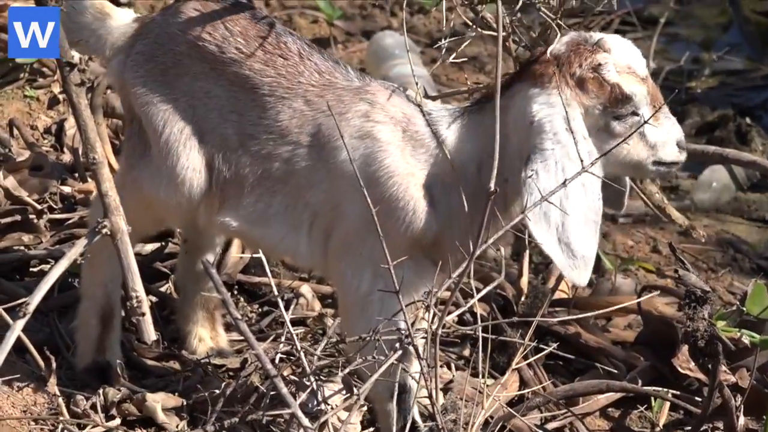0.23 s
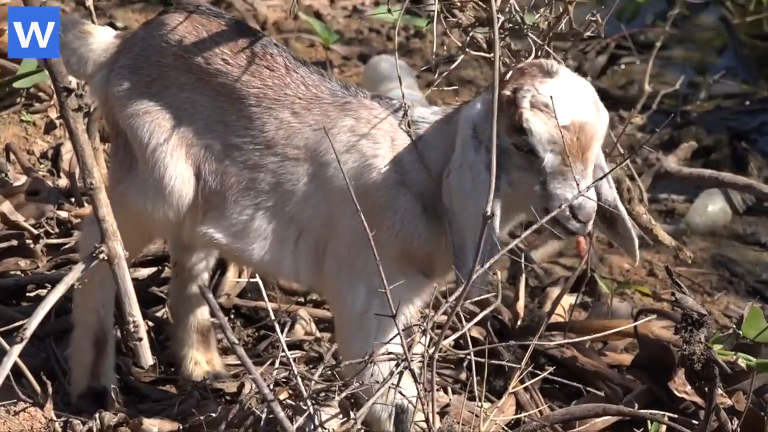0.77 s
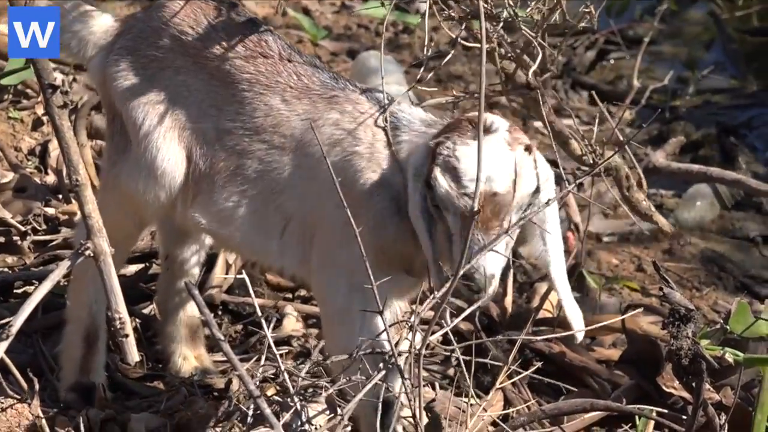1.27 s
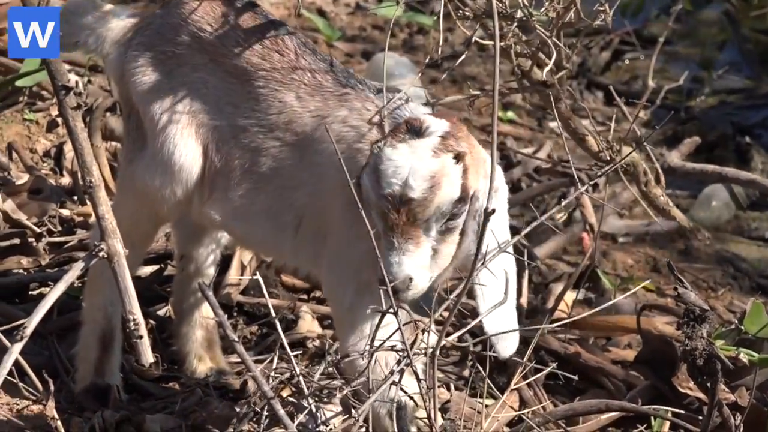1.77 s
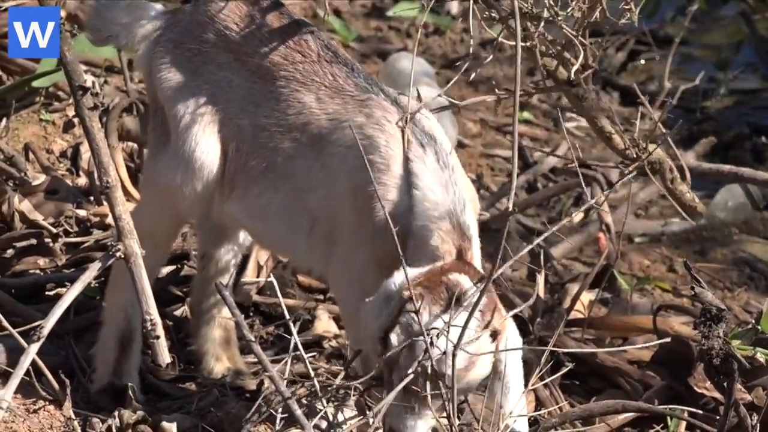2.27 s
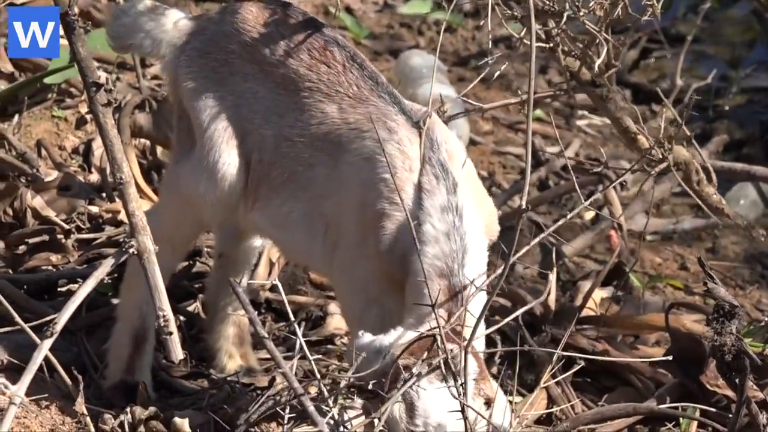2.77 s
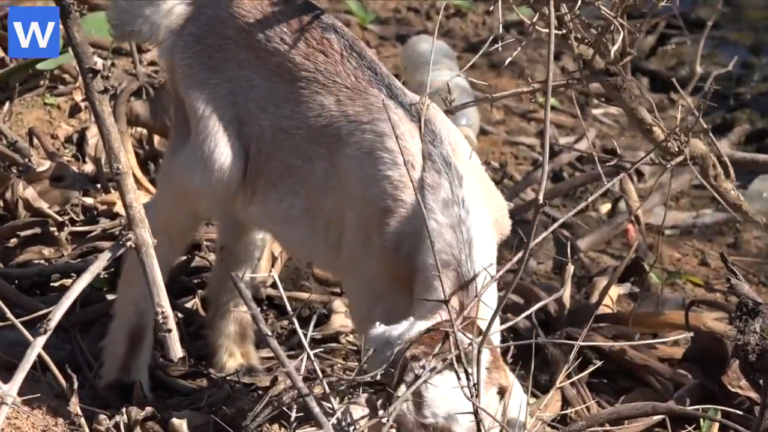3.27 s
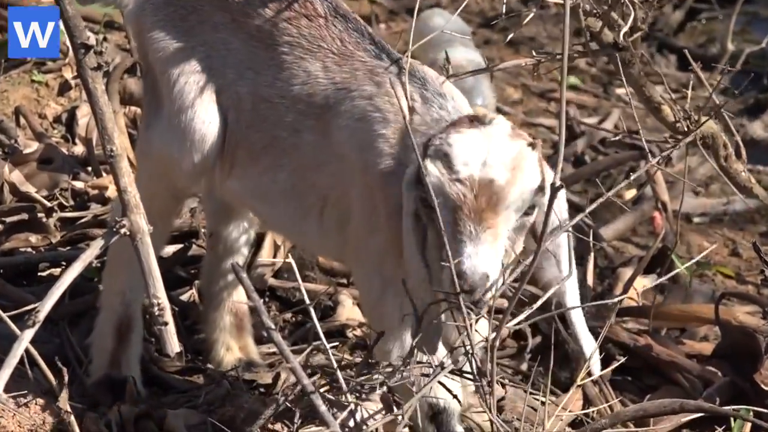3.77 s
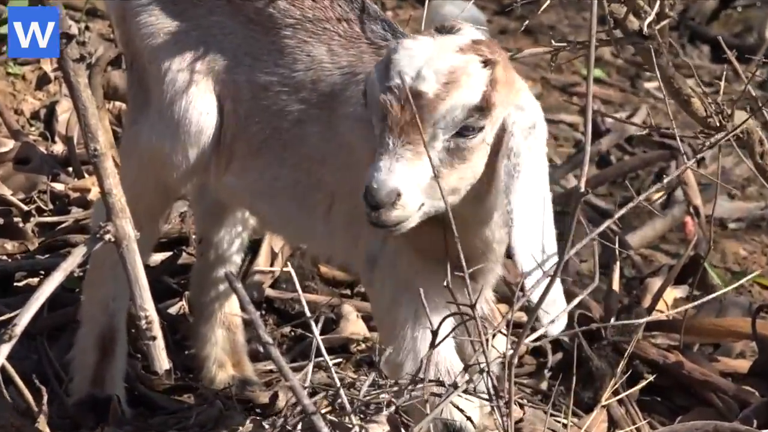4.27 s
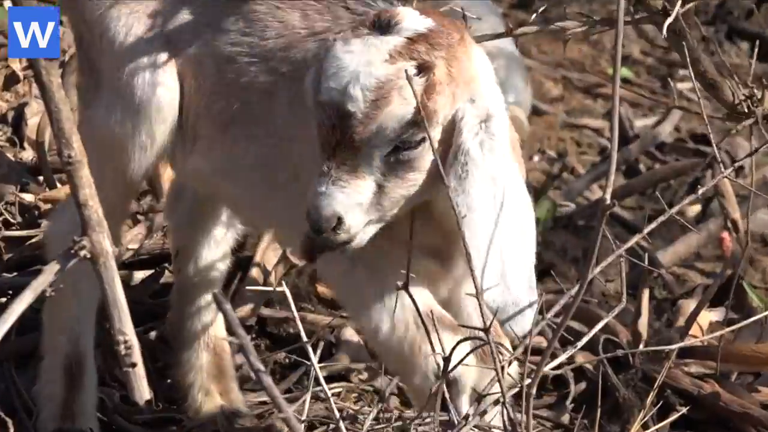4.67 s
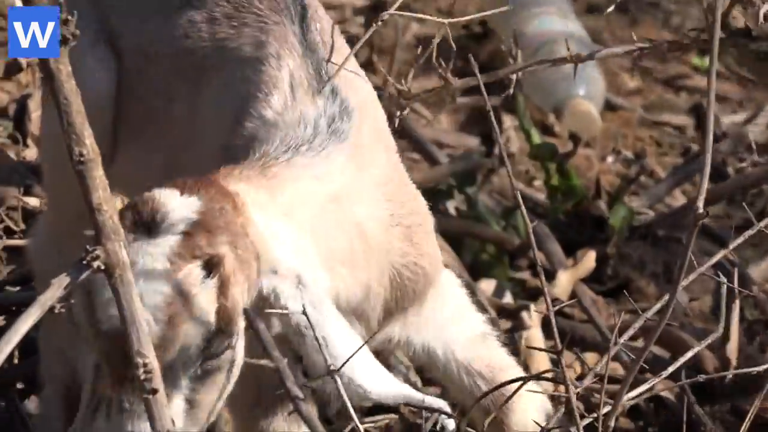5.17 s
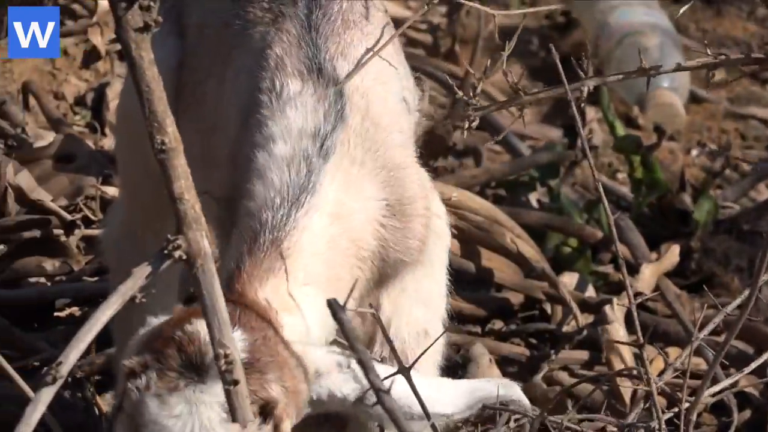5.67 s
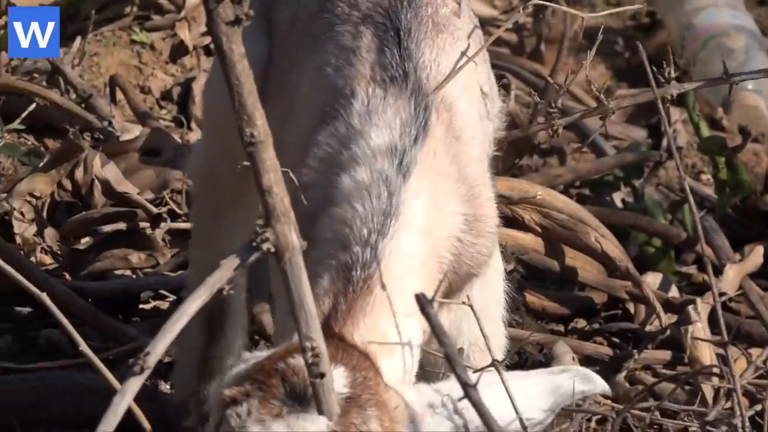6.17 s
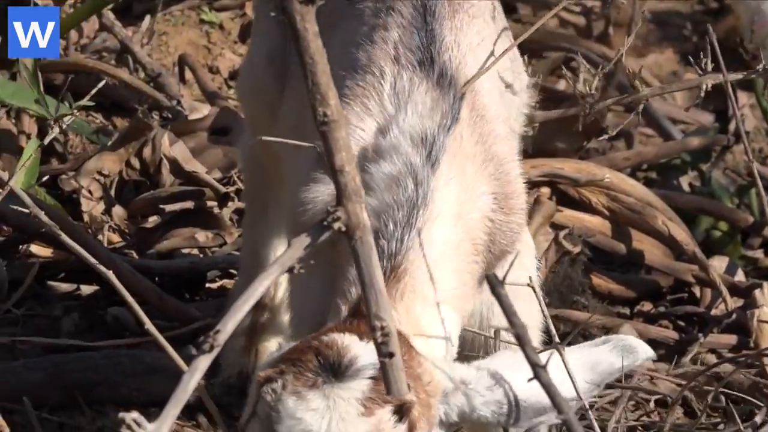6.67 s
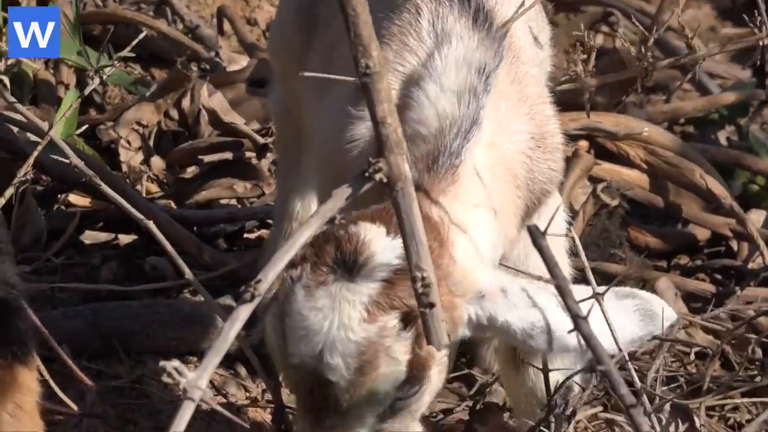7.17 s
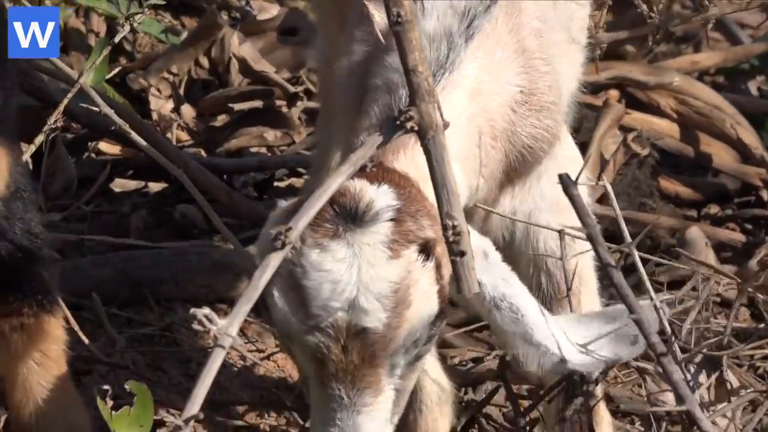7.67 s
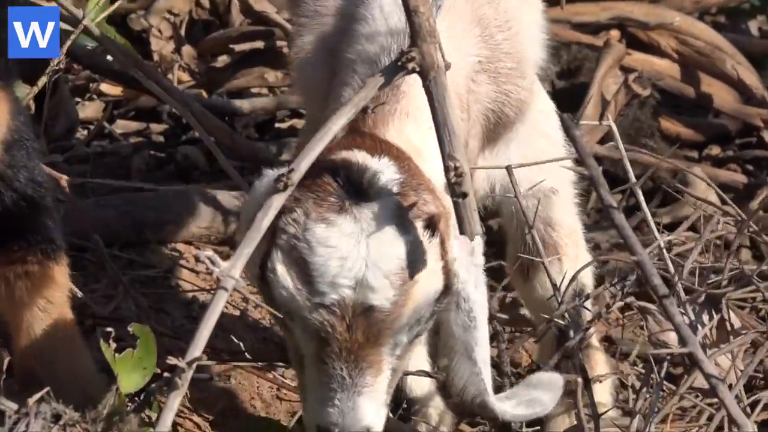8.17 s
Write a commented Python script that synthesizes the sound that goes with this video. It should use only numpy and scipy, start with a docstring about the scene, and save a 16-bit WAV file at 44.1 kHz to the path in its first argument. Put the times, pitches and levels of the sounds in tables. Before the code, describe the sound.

Small birds twitter over a distant chattering flock while wind thumps the microphone and a young goat rustles dry litter, snapping twigs.

```python
"""On a stream bank, a soft hiss of far foliage lies under a distant flock, noisy chatter of many blurred whistles.
From the start, near birds twitter in the brush: short gliding tones, buzzy where their pitch vibrates fast.
Gusts soon buffet the two microphone ports: low noise rumbles and thumps, and higher noise flutters.
Close by, a kid goat noses through the litter: bursts of tiny noise cracks, faint until about two seconds in.
Twigs snap under it from a little before then: sharp noise bursts with a brief ring."""
import sys
import numpy as np
from scipy import signal
from scipy.fft import rfft, irfft, next_fast_len
from scipy.io import wavfile
from scipy.ndimage import uniform_filter1d

SR = 44100
rng = np.random.default_rng(int(sys.argv[2]) if len(sys.argv) > 2 else 0)


def put_to_file(sound):
    """Save the sound as 16-bit audio at rate SR, in the file named by the first command-line argument."""
    columns = np.atleast_2d(sound).T  # one column per channel
    safe = np.clip(columns, -1, 1)
    whole_steps = np.round(safe * 32767)
    wavfile.write(sys.argv[1], SR, whole_steps.astype(np.int16))


N = 371322
T = np.arange(N) / SR  # s

# Levels in the event tables come before each layer's own trim; spectra are relative, per Hz.
# spectrum of the far foliage: pitch_hz, level_db
AIR_COLOUR = [(250, -3.5), (500, 1.5), (800, 1.5), (1130, 6), (1290, -0.5), (1550, 4.5), (2200, 0),
              (3500, 3.5), (5000, 4), (7200, -3.5), (9000, -8), (10800, -13), (12500, -7.5), (14700, -19)]
# spectrum of the hiss that differs between the ports: pitch_hz, level_db
AIR_WIDE_COLOUR = [(800, 16), (2400, -19), (4000, -21), (6200, 0), (7500, 27.5), (9500, 18), (10500, 18),
                   (12000, 2), (15000, -15)]
AIR_DB = -41.5

# loudness of the distant flock: start_s, level_db
FLOCK_LEVEL = [(0, -33), (.35, -38.5), (1.2, -37.5), (1.6, -35), (2.35, -45), (2.7, -36.5), (3.1, -35.5),
               (3.5, -32), (4.2, -38), (4.9, -40.5), (5.5, -30.5), (6, -48.5), (6.4, -32.5), (6.9, -41),
               (7.3, -32), (7.5, -43), (7.9, -33), (8.42, -31.5)]
# spectrum of the distant flock: pitch_hz, level_db
FLOCK_COLOUR = [(1500, -39.5), (2500, -8.5), (2950, 3), (3600, 2), (4700, -2.5), (6200, 0.5), (7000, -7.5),
                (9000, -17.5)]
FLOCK_ANSWER_DB, FLOCK_ANSWER_S = -5.5, 0.067  # the flock swells around each near note

# notes of the near birds, with one faint distant call near 1 kHz at 7.8 s: start_s, syllable, length_s,
# middle_pitch_hz, level_db
NEAR_NOTES = [(.01, "slur", .053, 6530, -33.5), (0.052, "arch", 0.039, 5400, -27),
              (0.134, "arch", 0.049, 4420, -29), (.174, "hook", 0.053, 6650, -37),
              (.25, "hook", 0.042, 6340, -38), (0.273, "buzz", 0.037, 3690, -36.5),
              (0.393, "slur", 0.045, 5100, -36.5), (.42, "slur", .038, 3700, -36),
              (0.491, "hook", 0.056, 6560, -35.5), (0.573, "hook", 0.048, 5970, -33.5),
              (0.843, "whistle", 0.038, 3460, -35), (.841, "hook", 0.067, 6670, -39.5),
              (.912, "buzz", .06, 4600, -33.5), (1.044, "rasp", .06, 4150, -35.5),
              (1.239, "rasp", 0.095, 4450, -39), (1.395, "arch", 0.062, 4640, -30),
              (1.451, "dive", 0.026, 2710, -33), (1.467, "whistle", 0.035, 3725, -28),
              (1.57, "buzz", 0.047, 4620, -34.5), (1.645, "rise", 0.033, 3510, -35),
              (1.717, "whistle", .025, 6400, -35), (1.718, "rasp", 0.028, 4240, -31),
              (1.89, "whistle", 0.065, 3560, -32), (1.95, "rasp", 0.037, 3700, -31),
              (2.042, "rise", .023, 4630, -33), (2.072, "buzz", 0.055, 3750, -28.5),
              (2.218, "buzz", .04, 4270, -34), (2.226, "slur", .037, 6600, -39),
              (2.471, "whistle", 0.047, 4740, -38), (2.525, "hook", 0.061, 3700, -30.5),
              (2.807, "rise", .035, 4790, -30.5), (2.838, "dive", .035, 4600, -37),
              (2.973, "slur", .06, 4270, -31.5), (3.038, "arch", 0.017, 4990, -26.5),
              (3.059, "dive", 0.071, 2775, -32), (3.151, "rasp", .032, 2560, -31.5),
              (3.468, "whistle", 0.026, 4480, -27), (3.469, "dive", .034, 2620, -34),
              (3.591, "hook", 0.033, 4740, -33), (3.697, "slur", 0.047, 4120, -33.5),
              (3.78, "dive", .02, 3290, -31.5), (3.886, "rise", 0.023, 4220, -34),
              (3.923, "rasp", 0.034, 3710, -34), (3.962, "dive", .04, 1740, -42),
              (3.974, "whistle", .029, 6570, -38), (4.019, "rasp", 0.045, 4370, -33),
              (4.389, "arch", .04, 4620, -29), (4.452, "rise", 0.03, 3640, -30),
              (4.473, "rasp", 0.029, 3800, -31.5), (4.519, "rasp", .02, 2254, -31.5),
              (4.608, "slur", .06, 4700, -29), (4.676, "whistle", .045, 3680, -33),
              (4.686, "arch", 0.048, 5070, -32.5), (5.052, "hook", 0.047, 7050, -33),
              (5.116, "arch", 0.052, 5320, -26), (5.2, "rise", .032, 4240, -24.5),
              (5.322, "buzz", .06, 4900, -34.5), (5.44, "slur", 0.029, 3950, -31.5),
              (5.487, "arch", .05, 5090, -29), (5.564, "rise", 0.022, 4000, -28),
              (5.905, "whistle", .041, 6520, -38), (5.93, "buzz", 0.026, 4800, -35),
              (6.313, "whistle", .04, 6200, -34.5), (6.348, "slur", .037, 4690, -30.5),
              (6.398, "whistle", .057, 3640, -32), (6.637, "arch", 0.042, 5750, -25),
              (6.721, "hook", 0.041, 4390, -26.5), (6.74, "whistle", .02, 6400, -32),
              (6.787, "slur", 0.029, 3340, -36.5), (6.858, "whistle", 0.034, 3620, -34.5),
              (6.97, "buzz", 0.063, 3710, -35.5), (7.084, "dive", 0.039, 5200, -34),
              (7.171, "rasp", 0.042, 4070, -35), (7.253, "buzz", .055, 4810, -29.5),
              (7.389, "hook", .035, 3860, -36.5), (7.505, "hook", 0.023, 2200, -41),
              (7.56, "slur", 0.029, 4470, -26.5), (7.622, "rise", 0.024, 3940, -27.5),
              (7.719, "rise", 0.031, 3950, -33), (7.806, "whistle", 0.068, 1000, -47),
              (7.824, "dive", .02, 4450, -31.5), (7.993, "whistle", 0.014, 6170, -32.5),
              (8.094, "rasp", 0.086, 4100, -29.5), (8.236, "dive", 0.041, 4540, -31.5),
              (8.291, "rasp", 0.053, 3730, -29.5)]
# shape of each named syllable: start_pitch (ratio to middle), end_pitch (ratio to middle), buzz (0-1)
SYLLABLES = {"arch": (.69, .66, 0.21), "rise": (.83, 1.13, 0.26), "whistle": (1.02, 0.98, 0.091),
             "hook": (.8, 0.96, 0.49), "slur": (0.98, .84, 0.47), "buzz": (.93, .85, 0.71),
             "rasp": (1.25, .77, 0.903), "dive": (1.27, .69, 0.34)}

# gusts at the microphone: start_s, length_s, rumble_db (large eddies), flutter_db (small eddies)
GUSTS = [(0.03, 0.13, -16, -30.5), (0.245, 0.032, -15.5, -25), (0.318, 0.044, -15, -26),
         (0.43, 0.12, -21.5, -39.5), (0.875, 0.045, -18, -26), (1.169, 0.09, -19, -23.5),
         (1.393, 0.11, -19, -31), (2.144, 0.22, -18, -23.5), (2.358, 0.14, -45, -29.5),
         (2.615, 0.14, -30, -30), (2.781, 0.056, -25, -26.5), (3.064, 0.065, -19.5, -31.5),
         (3.19, 0.15, -20.5, -39), (3.385, 0.19, -19.5, -24), (3.787, 0.4, -21.5, -27.5),
         (4.522, 0.23, -20, -23.5), (4.777, 0.52, -32.5, -27.5), (5.318, 0.077, -32, -29),
         (5.441, 0.066, -28, -21), (5.572, 0.04, -34.5, -18.5), (5.685, 0.2, -25.0, -29),
         (5.988, 0.21, -20, -30.5), (6.076, 0.28, -29, -24), (6.374, 0.1, -46, -28),
         (6.54, 0.078, -22.5, -24.5), (6.733, 0.17, -25.5, -28), (7.528, 0.074, -18, -27),
         (7.7, 0.18, -27.0, -45), (8.05, 0.2, -19.5, -29.5), (8.296, 0.086, -18.0, -34.5)]
# steady wind between the gusts: start_s, rumble_db
DRAUGHT = [(0.0, -27.5), (0.82, -31.5), (1.04, -32.5), (1.33, -32.5), (1.85, -28.5), (2.03, -32.5),
           (2.45, -27), (2.6, -38), (2.95, -34), (3.3, -24.5), (4.4, -29.5), (5.55, -31.5), (6.5, -30),
           (6.9, -25), (7.02, -36), (7.15, -30.5), (7.5, -25.5), (8.42, -26.5)]
# side the wind strikes: start_s, rumble_left_minus_right_db, flutter_left_minus_right_db
WIND_SIDE = [(0, 2.5, 4), (0.6, 8, 5.5), (0.91, 1.5, -3), (1.3, 1.5, -6.5), (1.7, 4, -6.5),
             (2.32, -6.5, -5), (3, -1, -17), (3.5, 4.5, -15), (4.1, 2.5, -23), (4.6, 6, -7), (5.55, 5, -10),
             (6.65, 4, -9), (7.4, 1, -3), (8.15, 2, -28), (8.42, 3, -14)]
# spectrum of the large eddies: pitch_hz, level_db
RUMBLE_COLOUR = [(15, -22), (40, -14.5), (65, -2), (100, 2.5), (135, -2), (200, -10.5), (320, -43)]
# spectrum of the deepest eddies: pitch_hz, level_db
DEEP_COLOUR = [(12, -26), (25, -7.5), (42, 2.5), (60, 7), (90, -8), (160, -25)]
# share of the deepest eddies in the rumble: start_s, deep_rumble_db
DEEP_SHARE = [(0, 1), (1.2, -3.5), (2.2, 0.5), (2.6, -27), (3.2, 1.5), (3.8, -11), (4.6, -6), (5.2, -32),
              (6.2, -16), (7.2, -1.5), (8.4, -1.5)]
# spectrum of the small eddies: pitch_hz, level_db
FLUTTER_COLOUR = [(70, -18.5), (120, -1), (170, -0.5), (250, -3.5), (350, -11), (500, -20), (750, -28),
                  (1200, -51.5)]
# single eddies thumping the ports: centre_s, peak_db, pitch_hz
THUMPS = [(.14, -19, 70), (0.37, -14, 55.4), (1.226, -40, 98), (2.219, -3, 71), (4.629, -4, 80),
          (7.604, -7.5, 115), (8.076, -7.5, 95), (8.191, -5, 80.5)]
GUST_ATTACK_S, GUST_RELEASE_S = 0.048, 0.032
DRAUGHT_FLUTTER_DB = -11.5  # against the rumble of the draught

# muzzle and hooves pushing into the litter: start_s, length_s, level_db
RUSTLES = [(2.15, 0.024, -56), (2.335, .05, -41), (3.44, 0.093, -46.5), (4.38, 0.022, -49), (4.7, .11, -45),
           (4.82, .18, -41), (5.04, 0.087, -45.5), (5.12, 0.21, -45), (5.33, .09, -41), (5.46, .15, -48.5),
           (5.62, 0.25, -44.5), (5.88, .18, -52), (6.09, 0.15, -46), (6.2, .26, -43), (6.54, .16, -43.5),
           (6.72, 0.1, -49), (7.72, 0.59, -50.5), (8.335, .08, -40.5)]
# spectrum of the dry leaves: pitch_hz, level_db
LEAF_COLOUR = [(300, -13.5), (800, -3.5), (1500, 0), (2500, -1), (4000, 1.5), (6000, 0), (9000, -4),
               (11000, -13), (15000, -16)]
RUSTLE_ATTACK_S, RUSTLE_RELEASE_S, LITTER_REST_DB = 0.007, 0.027, -56

# twigs snapping: start_s, peak_db, main_ring_hz, splintering_s
SNAPS = [(1.684, -21, 4300, .004), (2.175, -22.5, 7000, 0.0077), (2.3073, -9.5, 6200, 0.0037),
         (2.331, -16, 4540, .003), (2.337, -12.5, 6240, 0.016), (2.413, -17.5, 6000, .002),
         (2.4395, -11, 8200, 0.0024), (3.46, -15, 6400, 0.0081), (3.511, -13, 4430, 0.0025),
         (4.779, -18.5, 4200, .003), (4.8189, -1.5, 5850, 0.0038), (4.843, -14.5, 3800, 0.0054),
         (4.983, -15, 5900, .002), (5.377, -30, 3700, .005), (5.638, -16.5, 5370, 0.0037),
         (5.7524, -12.5, 4560, .002), (5.789, -21, 3520, .01), (5.8482, -3.5, 5900, 0.0079),
         (6.222, -24, 8500, .003), (6.357, -20, 7900, .003), (6.454, -22, 3400, 0.0049),
         (8.346, -22, 3000, .008), (8.3587, -13, 7900, 0.0069), (8.385, -20, 6800, .006)]
# spectrum of the snapping wood: pitch_hz, level_db
TWIG_COLOUR = [(500, -23), (1500, -11), (2600, -1), (4000, 2), (6000, 0), (7200, -0.5), (8500, 3.5),
               (10500, -2.5), (15000, -8)]

TOP_HZ = 15900  # upper limit of the recorder


def undb(db):
    """Decibels to gain."""
    return 10 ** (np.asarray(db) / 20)


def unit(x):
    """Scale to rms 1."""
    return x / np.sqrt(np.mean(x ** 2) + 1e-20)


def smooth(x, seconds):
    """Running mean."""
    return uniform_filter1d(x, int(seconds * SR))


def curves(table):
    """The columns after the time column, one value a sample."""
    s, *columns = np.transpose(table)
    return [np.interp(T, s, column) for column in columns]


def colour(x, points):
    """Causal filter with the given (Hz, dB) response, falling 24 dB an octave above the last point."""
    hz, db = np.transpose(points)
    size = 2 * next_fast_len(x.shape[-1] // 2 + 2048, True)
    octave = np.log2(np.arange(size // 2 + 1) * SR / size + 1)
    rolloff_db = 24 * np.maximum(octave - np.log2(hz[-1]), 0)
    response_db = np.interp(octave, np.log2(hz), db) - rolloff_db
    # folding the cepstrum gives minimum phase
    cepstrum = irfft(np.log(undb(response_db)))
    cepstrum[1:size // 2] *= 2
    cepstrum[size // 2 + 1:] = 0
    return irfft(rfft(x, size) * np.exp(rfft(cepstrum)))[..., :x.shape[-1]]


def coloured_noise(points):
    """Noise of rms 1 with the given spectrum."""
    return unit(colour(rng.standard_normal(N), points))


def walk(rate, size=N):
    """Random levels held 1 / rate s and slewed; rms 1."""
    k = max(int(SR / rate), 1)
    held = np.repeat(rng.standard_normal(size // k + 2), k)
    return unit(uniform_filter1d(uniform_filter1d(held, k), k))[:size]


def pan(x, db):
    """Share a sound between the channels, left minus right in dB."""
    left = undb(db) / (1 + undb(db))
    return 2 * np.array([x * left, x * (1 - left)])


def add(track, s, sound):
    """Mix a short sound into a track at time s."""
    i = int(np.clip(s * SR, 0, N))
    track[i:i + len(sound)] += sound[:N - i]


def swells(events, attack_s, release_s, rest_db):
    """Strength of overlapping (s, length s, dB) swells over a resting level: each rises, holds and dies away."""
    power = undb(rest_db) ** 2 + np.zeros(N)
    t = T[:SR]
    for s, length, db in events:
        shape = np.minimum(t / attack_s, 1) * np.exp(-np.maximum(t - length, 0) / release_s)
        add(power, s, (undb(db) * shape) ** 2)
    return np.sqrt(power)


def brush(x, t60, wet_db):
    """Swaying stems scatter a short diffuse tail that keeps changing."""
    t = T[:SR // 2]
    decay = np.exp(-np.log(1000) * t / t60) * (t > .003)
    tails = rng.standard_normal((2, len(t))) * decay
    first, second = (signal.fftconvolve(x, tail / np.linalg.norm(tail))[:N] for tail in tails)
    sway = 2 * walk(3)  # radians, turning between the two tails
    return x + undb(wet_db) * (first * np.cos(sway) + second * np.sin(sway))


def air(side_db=-12.5, sway_db=1.5):
    """Far foliage gives a noise hiss that wavers below about 2.6 kHz; opposite-signed noise widens it."""
    hiss = coloured_noise(AIR_COLOUR)
    lower = signal.sosfiltfilt(signal.butter(2, 2600, fs=SR, output="sos"), hiss)
    hiss += lower * (undb(sway_db * walk(7.9)) - 1)
    wide = coloured_noise(AIR_WIDE_COLOUR) * np.array([[1], [-1]])
    return undb(AIR_DB) * (hiss + undb(side_db) * wide)


def note(length, start_hz, middle_hz, end_hz, buzz, buzz_hz=450, swing_hz=560, shake_hz=330, overhang=1.25):
    """One whistle bends through three pitches; in a buzzy one a second, uneven vibration swings the pitch."""
    size = int(max(length, .005) * overhang * SR)
    u = np.linspace(-1, 1, size) * overhang  # -1 and 1 mark the nominal ends
    slope = (end_hz - start_hz) / 2
    bend = (start_hz + end_hz) / 2 - middle_hz
    arch = middle_hz + slope * u + bend * u ** 2
    vibration_hz = buzz_hz * np.exp(0.1406 * walk(60, size))
    vibration = np.sin(2 * np.pi * np.cumsum(vibration_hz) / SR)
    depth = np.clip(buzz, 0, 1) ** 1.226 + 0.07
    hz = arch + depth * (swing_hz * vibration + shake_hz * walk(900, size))
    strength = signal.windows.tukey(size, .6) * undb(1.55 * walk(250, size))
    return unit(strength * np.sin(2 * np.pi * np.cumsum(hz) / SR))


def flock(near, level_db=-3.9, bouts_db=1.2, pitch_hz=4300, spread=.25, glide=.16, scatter_db=2.0, count=850):
    """Many far birds with the same kind of notes, blurred by the brush; they join in with the near ones."""
    out = np.zeros(N)
    starts = np.linspace(-.02, T[-1], count)
    for s, (length, pitch, rise, fall, size, buzz) in zip(starts, rng.standard_normal((count, 6))):
        hz = pitch_hz * np.exp(spread * np.clip(pitch, -2, 2))
        start_hz = hz * np.exp(glide * rise - .08)
        end_hz = hz * np.exp(glide * fall - .08)
        sound = note(.035 * np.exp(.3 * length), start_hz, hz, end_hz, 0.22 + 0.298 * abs(buzz))
        add(out, s + .01 * rise, undb(scatter_db * size) * sound)
    chatter = unit(colour(brush(out, t60=0.16, wet_db=-7.5), FLOCK_COLOUR))
    chatter /= np.sqrt(smooth(chatter ** 2, .06) + 0.02)  # even out the chance clusters
    answer = undb(FLOCK_ANSWER_DB) ** 2 * smooth(near ** 2, FLOCK_ANSWER_S)
    calling = undb(curves(FLOCK_LEVEL)[0] + level_db + bouts_db * walk(12))
    return chatter * np.sqrt(calling ** 2 + answer)


def near_birds(level_db=-3.5):
    """Quick twittering from the nearest perches: a few syllables, sung at changing pitch; once, a faint call
    sounds from further off."""
    out = np.zeros(N)
    for s, syllable, length, hz, db in NEAR_NOTES:
        start, end, buzz = SYLLABLES[syllable]
        sound = note(length, start * hz, hz, end * hz, buzz)
        centred_s = s + (length - len(sound) / SR) / 2
        add(out, centred_s, undb(db + level_db) * sound)
    return brush(out, t60=0.11, wet_db=-7)


def add_thumps(rumble, thump_cycles=0.48):
    """A single eddy strikes the ports as a low swing under a bell-shaped envelope, thump_cycles wide."""
    t = T[:SR // 10] - .05
    for s, db, hz in THUMPS:
        swing = np.cos(2 * np.pi * hz * t + rng.uniform(0, 2 * np.pi))
        add(rumble, s + t[0], undb(db) * swing * np.exp(-(hz * t / thump_cycles) ** 2 / 2))


def wind(flicker_db=4.1, unrest_db=1.6, rumble_db=-0.93, flutter_db=-0.57, edge_db=4.0, hard_db=-34):
    """Large eddies rumble on the ports; small ones flutter, and reach higher in a hard gust."""
    gusts, draught_db = np.array(GUSTS), curves(DRAUGHT)[0]
    large = swells(gusts[:, :3], GUST_ATTACK_S, GUST_RELEASE_S, draught_db)
    large *= undb(unrest_db * walk(20))
    small = swells(gusts[:, [0, 1, 3]], GUST_ATTACK_S, GUST_RELEASE_S, draught_db + DRAUGHT_FLUTTER_DB)
    large_side_db, small_side_db = curves(WIND_SIDE)

    deep = undb(curves(DEEP_SHARE)[0]) * coloured_noise(DEEP_COLOUR)
    rumble = coloured_noise(RUMBLE_COLOUR) + deep
    rumble /= np.sqrt(smooth(rumble ** 2, .06) + 0.015)  # the gust sets the strength
    rumble *= large * undb(rumble_db)
    add_thumps(rumble)

    flicker = undb(flicker_db * walk(60))
    eddies = unit(colour(rng.standard_normal(N), FLUTTER_COLOUR) * flicker)
    eddies /= np.sqrt(smooth(eddies ** 2, .075) + 0.029)
    body = signal.sosfiltfilt(signal.butter(2, 170, fs=SR, output="sos"), eddies)
    edge = signal.sosfilt(signal.butter(1, 350, "high", fs=SR, output="sos"), eddies)
    force = np.clip(2 * np.log10(small / undb(hard_db)), -1, 1)  # -1 soft, 1 hard
    flutter = eddies - body + (undb(edge_db * force) - 1) * edge
    strength = small * undb(flutter_db)

    # the largest eddies cover both ports alike; the rest lean to the side they strike
    shared = signal.sosfiltfilt(signal.butter(1, 45, fs=SR, output="sos"), rumble)
    leaning = pan(rumble - shared + body * strength, large_side_db)
    return shared + leaning + pan(flutter * strength, small_side_db)


def litter(level_db=5.5, rate=1200, scatter_db=4.0, bunch_db=3.0, unrest_db=1.3,
           crack_s=0.00089, settle_s=0.0088, settle_db=-2.0):
    """Dry leaves give way in tiny cracks, bunched in quick clusters and sparse when the goat is still."""
    stir = swells(RUSTLES, RUSTLE_ATTACK_S, RUSTLE_RELEASE_S, LITTER_REST_DB)
    stir *= undb(unrest_db * walk(30))
    density = np.clip(stir / undb(-41), .3, 2)
    happens = rng.random(N) < rate * density / SR  # rate: cracks a second at density 1
    size_db = scatter_db * np.minimum(rng.exponential(size=N), 3.2) + bunch_db * walk(70)
    power = (happens * undb(size_db)) ** 2 / density + 1e-18

    def fading(s):
        return signal.lfilter([1 / (s * SR)], [1, -np.exp(-1 / (s * SR))], power)

    # each crack is a burst of noise, and the leaves around it settle a little longer
    envelope = np.sqrt(fading(crack_s) + undb(settle_db) ** 2 * fading(settle_s))
    crackle = envelope * rng.standard_normal(N)
    return unit(colour(crackle, LEAF_COLOUR)) * stir * undb(level_db)


def twigs(level_db=-3.0, ring_t60=0.0081, ring_share=0.12, splinter_db=-8, break_s=0.00098, rise_s=0.00012):
    """A sharp break, then fibres splinter; the twig rings for a few milliseconds."""
    out, t = np.zeros(N), T[:SR // 16]
    for s, db, hz, splinter_s in SNAPS:
        decay = np.exp(-t / break_s) + undb(splinter_db) * np.exp(-t / splinter_s)
        force = rng.standard_normal(len(t)) * decay * (1 - np.exp(-t / rise_s))
        ring = np.cos(2 * np.pi * hz * t) * np.exp(-np.log(1000) * t / ring_t60)
        ringing = signal.fftconvolve(force, ring)[:len(t)]
        snap = colour(force + ring_share * ringing, TWIG_COLOUR)
        add(out, s, undb(db + level_db) * snap / np.abs(snap).max())
    return brush(out, t60=.07, wet_db=-12)


def scene(perch_db=0.0, perch_spread_db=0.4, goat_db=-1.1):
    """The flock is central, the near birds waver slightly about it, the goat is just right; the wind leans most."""
    near = near_birds()
    birds = pan(near, perch_db + perch_spread_db * walk(5)) + flock(near)
    goat = pan(litter() + twigs(), goat_db)
    return air() + birds + wind() + goat


def record(dry):
    """The recorder cuts the top with a steep low-pass."""
    return signal.sosfilt(signal.ellip(8, .2, 70, TOP_HZ, fs=SR, output="sos"), dry)


dry = scene()
out = record(dry)
put_to_file(out)
```